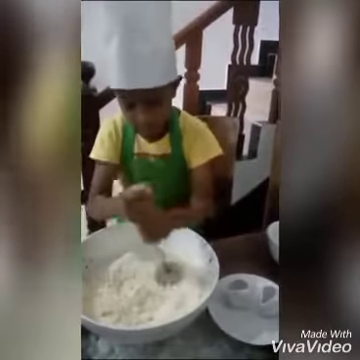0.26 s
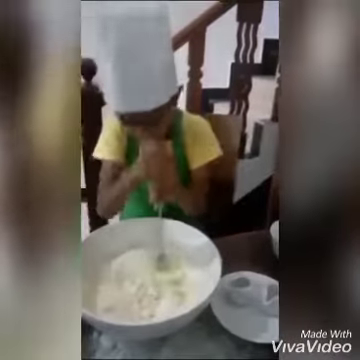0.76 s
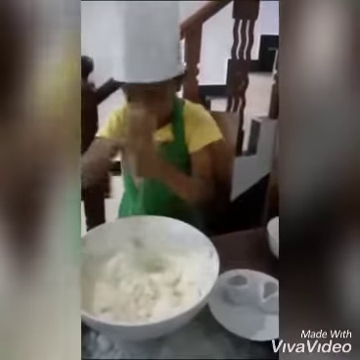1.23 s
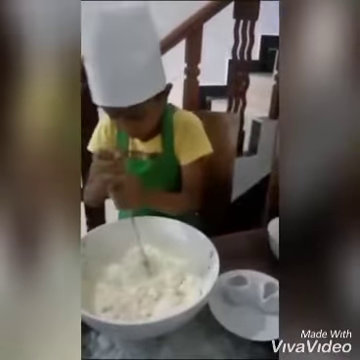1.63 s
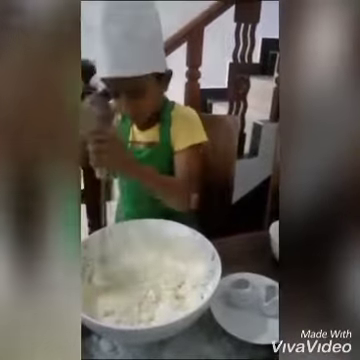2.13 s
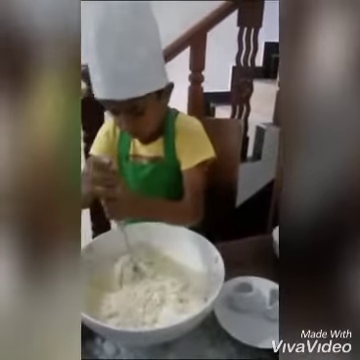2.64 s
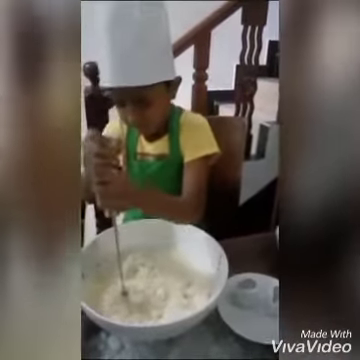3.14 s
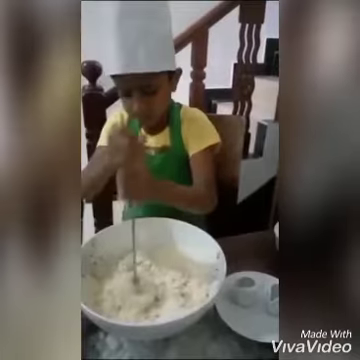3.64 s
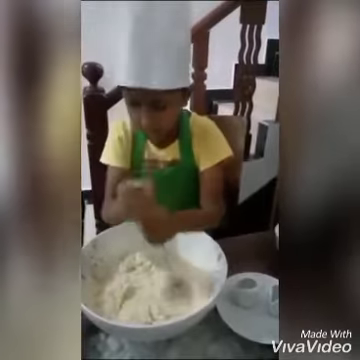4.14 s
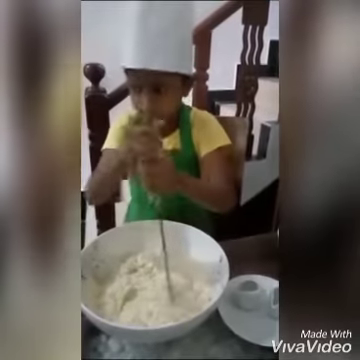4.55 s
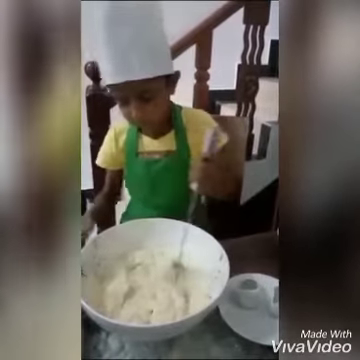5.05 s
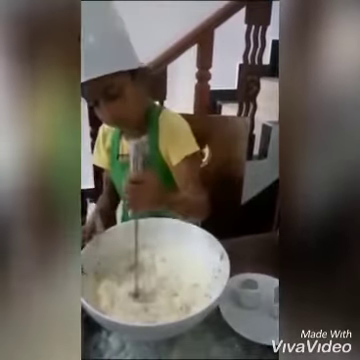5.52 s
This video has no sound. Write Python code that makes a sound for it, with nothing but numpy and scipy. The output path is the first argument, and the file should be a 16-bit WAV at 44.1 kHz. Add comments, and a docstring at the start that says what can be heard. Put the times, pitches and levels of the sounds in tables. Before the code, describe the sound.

Close up in a hard-walled room, a steel push whisk works thick batter in a large bowl. Quick uneven knocks, clinks, bright ticks and soft wet scrapes come densely at first, then thin out after about four seconds. A faint high machine whine in the distance fades away early. A tiny squeak ends it. Phone-like sound with dulled top treble.

```python
"""A faint machine whine is heard first, over quiet room air; it dies away in the distance.
A steel push whisk works thick batter in a large bowl on a table, in a hard-walled room.
Its head knocks and bounces on the bowl and its shaft clinks in the handle: noise cracks over ringing modes.
The batter churns and crackles, made of random clicks given a tone colour and swelling with each stroke.
Short damped notes make the pings, bubbles and table bumps; a wavering tone makes one thin squeak at the end."""
import sys
import numpy as np
from scipy import signal
from scipy.fft import rfft, irfft
from scipy.io import wavfile
from scipy.ndimage import uniform_filter1d

SR = 44100
rng = np.random.default_rng(int(sys.argv[2]) if len(sys.argv) > 2 else 0)


def master(y):
    """Save y as 16-bit WAV."""
    cut = np.clip(np.atleast_2d(y).T, -1, 1)
    pcm = np.round(cut * 32767)  # scale
    wavfile.write(sys.argv[1], SR, pcm.astype(np.int16))


N = 254898
TIME = np.arange(N) / SR


def undb(db):
    """Turn decibels into a plain gain."""
    return 10 ** (np.asarray(db) / 20)


def unit(x):
    """Scale to rms 1."""
    return x / np.sqrt(np.mean(x ** 2))


def curve(rows):
    """Join the points of a (t/s, value) table by straight lines, for every sample."""
    return np.interp(TIME, *np.transpose(rows))


def add(track, s, sound):
    """Mix a sound into the track at time s."""
    start = max(int(s * SR), 0)
    track[start:start + len(sound)] += sound[:N - start]


def band(x, lo, hi, order=3):
    """Keep only the pitches from lo to hi, in Hz."""
    sos = signal.butter(order, [lo, min(hi, SR / 2 - 1)], "band", fs=SR, output="sos")
    return signal.sosfilt(sos, x)


def colour(x, points):
    """Shape a sound by a spectrum of (f/Hz, level/dB) points, at rms 1."""
    hz, db = np.transpose(points)
    bins = np.arange(len(x) // 2 + 1) * SR / len(x) + 1  # the 1 avoids log(0)
    gain = undb(np.interp(np.log(bins), np.log(hz), db))
    gain = gain * np.minimum(bins / hz[0], 1) ** 2  # fall away below the first point
    return unit(irfft(rfft(x) * gain, len(x)))


def walk(rate):
    """Smooth random drift with rms 1, heading for a new value rate times a second."""
    hold = int(SR / rate)
    steps = np.repeat(rng.standard_normal(N // hold + 1), hold)
    return unit(uniform_filter1d(steps, hold)[:N])


def fade(t, t60):
    """Exponential decay, 60 dB down after t60 seconds."""
    return np.exp(-np.log(1000) * t / t60)


def swell(middle_s, rise_s, fall_s):
    """A bell-shaped envelope with its own rise and fall."""
    t = TIME - middle_s
    return np.exp(-(t / np.where(t < 0, rise_s, fall_s)) ** 2 / 2)


def grains(rate, spread_db):
    """Random clicks of uneven size, about rate per second."""
    clicks = (rng.random(N) < rate / SR) * rng.choice([-1, 1], N)
    return clicks * undb(spread_db * np.minimum(rng.exponential(size=N), np.pi))


def blips(rows, rise_s, glide):
    """Single damped notes that swell for rise_s and die; the pitch climbs by the share glide per rise time."""
    out, t = np.zeros(N), np.arange(SR // 8) / SR
    age = t / rise_s
    envelope = age * np.exp(1 - age)
    for s, hz, db in rows:
        note = np.sin(2 * np.pi * hz * t * (1 + glide * age / 2))
        add(out, s, undb(db) * envelope * note)
    return out


# colour of the background air: (f/Hz, relative level/dB)
AIR_SPECTRUM = [(15, -53), (25, -32), (43, -6), (63, -4), (80, -2.5), (377, -7), (615, -14.5), (665, -15),
                (817, -17.5), (2130, -25), (3380, -35), (7160, -40.5), (8150, -37.5), (12000, -47.5),
                (15600, -65), (22000, -120)]


def air():
    """Quiet, dull household background: coloured noise whose level wavers a little."""
    return colour(rng.standard_normal(N), AIR_SPECTRUM) * undb(-48.5 + 0.43 * walk(27))


# how long the echo lasts at each pitch: (f/Hz, time to fall 60 dB/s)
ECHO_TIMES = [(80, 1), (160, 0.79), (300, 0.53), (800, 0.5), (2000, 0.55), (5000, 0.41), (11000, 0.32)]


def room(x, wet_db, early_db, early_t60, gap):
    """Early reflections off table and cook join a diffuse tail whose lows last longest; gap is in s."""
    t = np.arange(SR) / SR
    hz, t60 = np.transpose(ECHO_TIMES)
    bins = np.arange(SR // 2 + 1) + 1
    noise = rfft(rng.standard_normal(SR))
    tail = 0
    # each pitch region of the noise fades at its own speed
    for share, seconds in zip(np.eye(len(hz)), t60):
        region = irfft(noise * np.interp(np.log(bins), np.log(hz), share), SR)
        tail = tail + region * fade(t, seconds)
    early = rng.standard_normal(SR) * fade(t, early_t60)
    echo = undb(wet_db) * tail / np.linalg.norm(tail)
    echo = echo + undb(early_db) * early / np.linalg.norm(early)
    out = x.copy()
    add(out, gap, signal.fftconvolve(x, echo)[:N])
    return out


# partials of the distant machine: (multiple of the base pitch, starting level/dB, fading/dB per s)
MACHINE_PARTIALS = [(3, -55.5, 0.5), (4, -53.5, 6), (5, -62.5, 0.5)]
WHINE_HZ = 715
WHINE_STOP_S, WHINE_RUN_DOWN_T60 = 1.97, 2.1  # when the final fade begins, and its 60 dB time in s


def machine():
    """A far motor whines: its upper partials waver in level, share a slight pitch drift and fade out."""
    phase = 2 * np.pi * np.cumsum(WHINE_HZ * (1 + 0.0008 * walk(16))) / SR
    out = 0
    for multiple, db, fading_db in MACHINE_PARTIALS:
        level = undb(db - fading_db * TIME + 2.2 * walk(7.64))
        out = out + level * np.sin(round(multiple) * phase)
    run_down = fade(np.maximum(TIME - WHINE_STOP_S, 0), WHINE_RUN_DOWN_T60)
    return np.sqrt(2) * out * run_down  # sqrt(2) turns rms levels into sine peaks


# the table rocks under the bowl: (t/s, f/Hz, level/dB)
TABLE_BUMPS = [(2.304, 76, -22)]


def table():
    """The table rocks with a low, quickly damped note."""
    return blips(TABLE_BUMPS, rise_s=0.0068, glide=0)


# air pockets popping in the dough: (t/s, f/Hz, level/dB)
AIR_POCKETS = [(0.748, 1450, -34.5), (2.074, 1580, -36), (2.324, 1360, -31), (4.508, 1450, -39.5),
               (4.528, 1290, -44)]


def pockets():
    """Air pockets pop with a slightly rising note; thick dough smothers each within a few cycles."""
    return blips(AIR_POCKETS, rise_s=0.0012, glide=0.013)


# the shaft's squeak: (t/s, level/dB)
SQUEAK_LEVEL = [(5.70, -100), (5.74, -55), (5.76, -55), (5.78, -54)]


def squeak():
    """Steel sliding in the handle sings a thin, unsteady note with a weak octave above it."""
    phase = 2 * np.pi * np.cumsum(5760 * (1 + 0.01 * walk(400))) / SR
    return undb(curve(SQUEAK_LEVEL)) * (np.sin(phase) + 0.2 * np.sin(2 * phase))


# the whisk's spring pings: (t/s, f/Hz, level/dB)
SPRING_PINGS = [(0.902, 1880, -17), (1.252, 1860, -18), (2.513, 1826, -21.5), (2.604, 1920, -33)]


def spring():
    """The whisk's spring pings: short notes that swell and die in milliseconds."""
    return blips(SPRING_PINGS, rise_s=0.0013, glide=0)


# wires flicking against each other: (t/s, peak level before a 1 dB lift/dB, f/Hz)
WIRE_FLICKS = [(0.3543, -25, 6620), (0.5008, -23.5, 8480), (0.627, -25, 6850), (1.0544, -22, 8400),
               (1.4795, -34.5, 6640), (1.7537, -26.5, 7950), (1.8347, -30.5, 8640), (2.0097, -45.5, 5580),
               (2.153, -37, 5100), (2.6519, -34, 9270), (2.9675, -23, 6240), (3.5242, -34.5, 8100),
               (5.3258, -43.5, 8300), (5.6377, -54, 8940)]


def wires():
    """Small bright ticks, each with a very brief ring and a weaker mode about an octave below."""
    out, t = np.zeros(N), np.arange(SR // 20) / SR
    for s, db, hz in WIRE_FLICKS:
        ring = 0.57 * np.sin(2 * np.pi * hz * t) + 0.19 * np.sin(2 * np.pi * hz * 0.48 * t)
        scratch = band(rng.standard_normal(len(t)), hz / 2, 10200)
        tick = scratch * fade(t, 0.025) + ring * fade(t, 0.023)
        add(out, s, tick * undb(db + 1.0) / np.abs(tick).max())
    return out


# strokes through the batter: (middle t/s, half-length/s, wire scrape level/dB,
# wet fizz relative to the scrape/dB, dough churn level/dB)
# a later -4 dB and a random waver act on both scrape and fizz
WHISK_STROKES = [(0.277, .07, -42.5, -6, -42), (0.5, .028, -36, -9, -38.5), (0.697, 0.051, -46, -3.5, -48),
                 (0.895, 0.013, -40.5, -9.5, -62), (1.048, 0.03, -38, -4.5, -33.5),
                 (1.337, 0.15, -51, -11, -54), (1.515, 0.018, -48.5, -4, -42),
                 (1.846, 0.013, -39.5, -8, -35), (1.99, 0.035, -60, -12, -59),
                 (2.318, .033, -46.5, -5, -43), (2.518, 0.04, -52, -6, -74), (2.63, 0.017, -53, 0, -38),
                 (3.125, 0.036, -53.5, -7, -42), (3.36, 0.074, -60, -24, -64),
                 (3.507, 0.05, -49.5, -6.5, -43.5), (3.77, 0.022, -64, -8, -55),
                 (3.974, 0.039, -41.5, -9.5, -41.5), (4.367, 0.032, -39, -11, -37),
                 (4.738, 0.068, -53, -3.5, -58.5), (5.316, 0.051, -73.5, 1.5, -62)]
# colours of dough, tearing wet films and scraping wires: each (f/Hz, relative level/dB)
CHURN_SPECTRUM = [(40, -16.5), (70, -9), (150, -5.5), (330, -10), (480, -13), (850, -20.5), (1200, -29),
                  (2500, -33.5), (5000, -53)]
FIZZ_SPECTRUM = [(3000, -27), (6000, -16), (7100, 7.5), (7700, 0.5), (8400, 7), (10700, 3), (12000, -60)]
SCRAPE_SPECTRUM = [(700, -1.5), (2000, 1), (4400, -4), (5400, -5), (7100, -10.5), (8000, -44), (12000, -38)]
# the dough gives way before the wires sweep, and settles slowly
DOUGH_LEAD_S, DOUGH_SWELL_S, DOUGH_SETTLE_S = 0.053, 0.072, .1


def batter():
    """Lumps of dough thump softly against the bowl; in each sweep the wires scrape and wet films tear."""
    churn_gain, fizz_gain, scrape_gain = 0, 0, 0
    for s, half_length, scrape_db, wet_db, dough_db in WHISK_STROKES:
        sweep = undb(scrape_db) * swell(s, half_length, half_length)
        scrape_gain = scrape_gain + sweep
        fizz_gain = fizz_gain + undb(wet_db) * sweep
        dough = swell(s - DOUGH_LEAD_S, DOUGH_SWELL_S, DOUGH_SETTLE_S)
        churn_gain = churn_gain + undb(dough_db) * dough
    churn = colour(grains(rate=300, spread_db=6.5), CHURN_SPECTRUM) * churn_gain
    fizz = colour(grains(rate=1900, spread_db=3.0), FIZZ_SPECTRUM) * fizz_gain
    scrape = colour(grains(rate=900, spread_db=1.5), SCRAPE_SPECTRUM) * scrape_gain
    catch_and_slip = undb(-4 + 2.76 * walk(110))
    return churn + (fizz + scrape) * catch_and_slip


# whisk head on the bowl: (t/s, strength level/dB, cushioning by batter 0-1,
# spot from wall 0 to bottom 1, number of bounces, time to the first bounce/s)
HEAD_BLOWS = [(0.3804, -22.5, 0.72, 0.1, 0, 0), (0.4307, -17.5, 0.01, 0.1, 0, 0),
              (0.49, -19.5, 0.11, 0.077, 0, 0), (0.527, -24, 0.09, 0.057, 1, .031),
              (0.879, -29.5, 0.16, 0.84, 0, 0), (0.925, -27.5, 0.34, 0.19, 0, 0),
              (1.0588, -12.5, 0.34, 0.024, 0, 0), (1.071, -25, 0, 0.21, 0, 0),
              (1.096, -22, 0.15, 0.46, 1, .026), (1.2938, -20, 0.05, 0.016, 0, 0),
              (1.337, -23, 0.29, 0.065, 1, .035), (1.512, -32.5, 0.36, 0.68, 0, 0),
              (1.538, -25.5, 0.17, 0, 0, 0), (1.575, -27.5, 0.24, 0, 0, 0), (1.635, -29, 0.46, 0.75, 0, 0),
              (1.677, -28.5, 0.74, 0, 0, 0), (1.695, -28, 0.87, 0, 0, 0), (1.76, -35, 0.11, 0.22, 0, 0),
              (2.098, -20.5, 0.04, 0.024, 0, 0), (2.141, -23.5, 0.16, 0.089, 1, .03),
              (2.417, -33.5, 1, 0.59, 0, 0), (2.627, -33.5, .9, 0.45, 0, 0), (2.656, -30, .8, 0, 1, .031),
              (2.834, -34.5, 1, 0.55, 0, 0), (2.939, -20, 0.27, 0.018, 0, 0), (2.96, -22, 0.35, 0.3, 0, 0),
              (2.967, -22.5, 0.02, 0.56, 0, 0), (2.975, -21, 0.1, 0.067, 0, 0),
              (3.144, -29, 0.58, 0.018, 0, 0), (3.299, -33.5, 1, 1, 0, 0), (3.575, -23.5, 0.11, 0.92, 0, 0),
              (3.71, -23.5, 0.09, 0.8, 0, 0), (3.843, -22, 0.02, 1, 0, 0), (3.964, -22, 0.09, 0.67, 0, 0),
              (4.176, -32.5, 0.8, 1, 0, 0), (4.525, -39, 0.31, 0.43, 0, 0), (4.841, -30, 1, 0, 0, 0),
              (4.86, -30.5, 0.55, 0.32, 1, .025), (5.103, -45, 0.67, 0.46, 0, 0)]
# each bounce comes sooner, weaker and deeper in the batter than the contact before it
BOUNCE_GAP_SHARE, BOUNCE_LOSS_DB, BOUNCE_CUSHION = .68, 4.5, 0.13


def contacts():
    """List every blow followed by its bounces, as (t/s, strength level/dB, cushioning, spot)."""
    rows = []
    for s, db, cushion, spot, bounces, gap in HEAD_BLOWS:
        for k in range(round(bounces) + 1):
            rows.append((s, db - k * BOUNCE_LOSS_DB, cushion + k * BOUNCE_CUSHION, spot))
            s = s + gap * BOUNCE_GAP_SHARE ** k
    return rows


def plunges(rise_s, wall_db, bottom_db):
    """The head squeezes the dough: a short, dull swell around each blow, strongest on the bottom."""
    out, t = np.zeros(N), np.arange(SR // 20) / SR
    middle = t[-1] / 2
    for s, strength_db, _, spot in contacts():
        push = colour(rng.standard_normal(len(t)), CHURN_SPECTRUM) * np.exp(-np.abs(t - middle) / rise_s)
        level_db = strength_db + wall_db + spot * (bottom_db - wall_db)
        add(out, s - middle, push * undb(level_db))
    return out


# colour of the dry crack at each contact: (f/Hz, relative level/dB)
CRACK_SPECTRUM = [(70, -4.5), (140, -2), (300, 11), (850, -1), (1100, -11.5), (2100, -7.5), (3200, -13.5),
                  (4400, -14), (5200, -23.5), (7000, -26), (7700, -34), (9000, -27.5), (12000, -42)]


def strike(modes, crack_db, scatter_db, detune, crack_t60):
    """One contact: the body rings, a little differently each time, under a dry crack of rattling wires."""
    t = np.arange(SR // 12) / SR
    hz, width, db = np.transpose(modes)[:, :, None]
    chance = rng.standard_normal((2, len(modes), 1))
    level = undb(db + scatter_db * chance[0])
    damping = np.exp(-np.pi * width * t)  # a wider resonance dies sooner
    ring = level * damping * np.sin(2 * np.pi * hz * (1 + detune * chance[1]) * t)
    ring[1::2] *= -1  # neighbouring modes radiate in opposite phase
    crack = colour(rng.standard_normal(len(t)), CRACK_SPECTRUM) * fade(t, crack_t60)
    landing = 1 - np.exp(-t / 0.0018)  # the wires land one after another
    return unit(ring.sum(axis=0) * landing) + undb(crack_db) * unit(crack * landing)


# borders between boom, thud, knock, tock, clack and tick: (f/Hz)
REGISTER_EDGES = [110, 250, 550, 1050, 1500, 3200, 12000]
# change in each of those registers under a full cushion of batter: (level/dB)
CUSHION_CHANGE = [3.5, -2.5, -15, -22, -33, -39.5]
# change in each on the bottom, which the table holds still: (level/dB)
BOTTOM_CHANGE = [4, -0.5, -15, -4, -10.5, -3.5]
# a harder blow is a shorter one: above this strength the boom gains less, by so many dB per dB
BOOM_KNEE_DB, BOOM_LAG = -26, 0.79


def hits(rows, modes, bare_db, lag, crack_db, scatter_db, detune, crack_t60):
    """A run of strikes; force, spot and the batter's cushioning set how strongly each register speaks."""
    out = np.zeros(N)
    attack = SR // 50  # levels are set over the first 20 ms
    for s, strength_db, cushion, spot in rows:
        sound = strike(modes, crack_db, scatter_db, detune, crack_t60)
        levels_db = strength_db + np.array(bare_db)
        levels_db = levels_db + cushion * np.array(CUSHION_CHANGE) + spot * np.array(BOTTOM_CHANGE)
        levels_db[0] -= BOOM_LAG * max(strength_db - BOOM_KNEE_DB, 0)
        for lo, hi, db in zip(REGISTER_EDGES, REGISTER_EDGES[1:], levels_db):
            part = band(sound, lo, hi)
            filter_delay = 2 / (np.pi * (hi - lo))  # taken off, so that all registers land together
            add(out, s + lag - filter_delay, part * undb(db) / np.std(part[:attack]))
    return out


# shaft hitting its stop in the handle: (t/s, strength level/dB, cushioning by batter 0-1)
SHAFT_CLINKS = [(0.12, -23.5, 0), (0.900, -23, 0.27), (1.251, -25.5, 0.5), (2.512, -30, 0.3),
                (2.604, -35, .9), (3.411, -30.5, 0.14), (4.2123, -23.5, 0.05), (4.842, -40.5, 0.4)]
# resonances of the whisk, damped by the hands: (f/Hz, width/Hz, relative level/dB)
WHISK_MODES = [(148, 56, -1.5), (307.5, 65, 3.5), (785, 570, -4), (892, 78, -1.5), (1825, 102, 0.5),
               (2260, 117, -4), (2867, 94, -7), (3540, 120, -14), (3826, 316, -2), (3860, 550, 19.5),
               (4840, 750, -28), (5500, 120, -13), (6500, 83, -13), (9160, 3200, -28)]
# the shaft on its stop, in each register from boom to tick: (relative level/dB)
CLINK_REGISTERS = [-7, -2.5, -4.5, -10, -2.5, -1]


def handle():
    """The shaft springs back against its stop, wherever the head is in the bowl."""
    rows = [(s, db, cushion, 0) for s, db, cushion in SHAFT_CLINKS]
    return hits(rows, WHISK_MODES, CLINK_REGISTERS, lag=.0005,
                crack_db=-2.5, scatter_db=-1.5, detune=0.035, crack_t60=0.025)


# resonances of the batter-damped bowl: (f/Hz, width/Hz, relative level/dB)
BOWL_MODES = [(148.3, 64, 0), (233, 78, -26), (334.5, 49.5, 1.5), (466, 186, -2), (673, 197, -4),
              (807, 64, -6.5), (1280, 150, -31), (1964, 67, -7.5), (2350, 545, 8.5), (2574, 630, -2),
              (3820, 390, -31), (4430, 300, -6.5), (5860, 860, -11), (9300, 2000, -23)]
# the head on the bare wall of the bowl, in each register from boom to tick: (relative level/dB)
BLOW_REGISTERS = [-7, -2, -1, -8, -4.5, -10]


def bowl():
    """The whisk head lands on the bowl and bounces, making its damped resonances ring."""
    return hits(contacts(), BOWL_MODES, BLOW_REGISTERS, lag=.0005,
                crack_db=1, scatter_db=3.0, detune=0.035, crack_t60=0.031)


def scene():
    """Mix the sounds in the bowl and in the hand, each with its echo, over the direct sounds."""
    in_bowl = bowl() + plunges(rise_s=0.0076, wall_db=-10.5, bottom_db=-4.5) + batter() + pockets()
    in_hand = handle() + wires() + squeak()
    # bowl and handle stand at different heights, so each meets its own reflections
    in_bowl = room(in_bowl, wet_db=-5.0, early_db=-16, early_t60=0.12, gap=.005)
    in_hand = room(in_hand, wet_db=-5.5, early_db=-12.5, early_t60=0.32, gap=.005)
    direct = spring() + table()  # too small or low to stir the room
    return (in_bowl + in_hand + direct + machine() + air())[None]


def record(dry):
    """The phone cuts the top of the treble with a steep filter at 11500 Hz."""
    return signal.sosfilt(signal.ellip(8, .2, 70, 11500, fs=SR, output="sos"), dry)


dry = scene()
out = record(dry)
master(out)
```